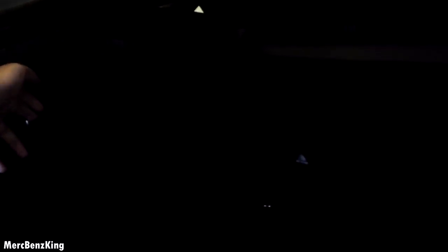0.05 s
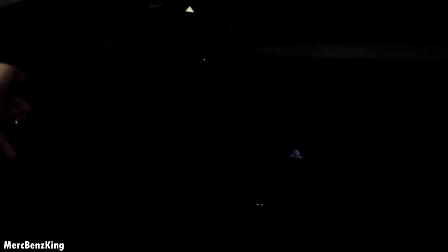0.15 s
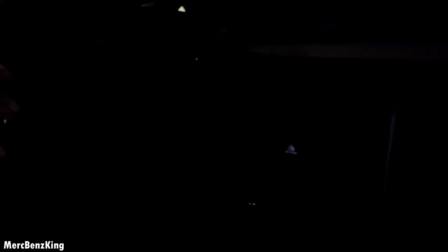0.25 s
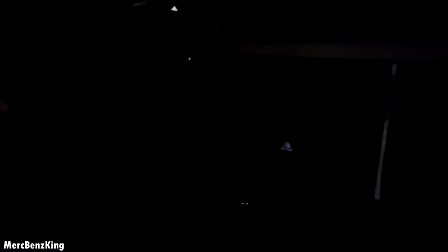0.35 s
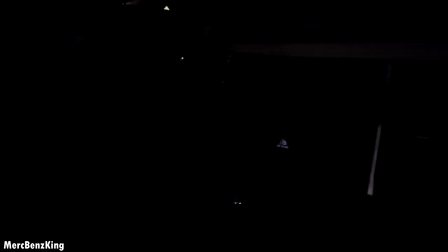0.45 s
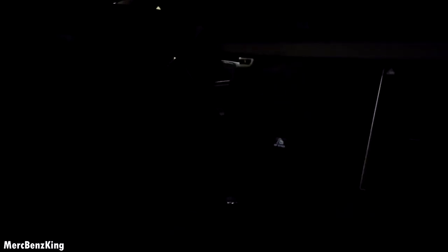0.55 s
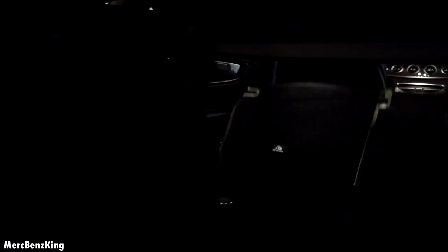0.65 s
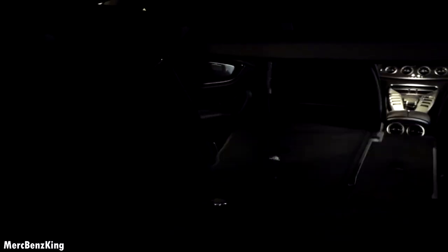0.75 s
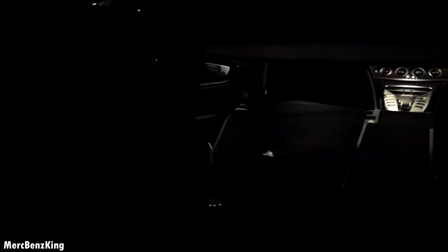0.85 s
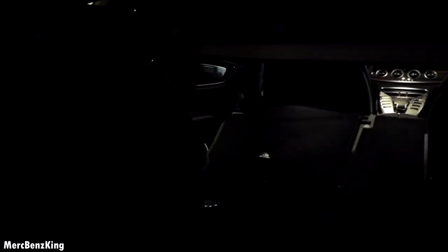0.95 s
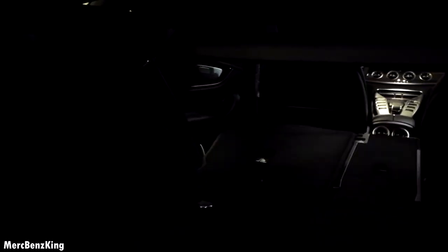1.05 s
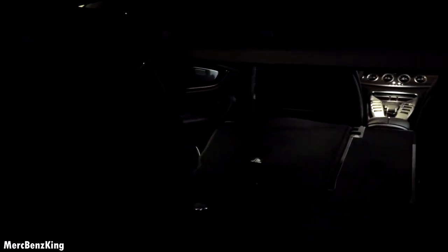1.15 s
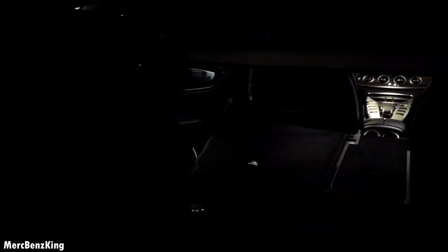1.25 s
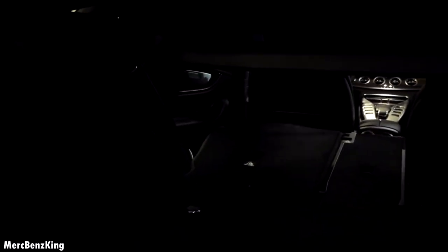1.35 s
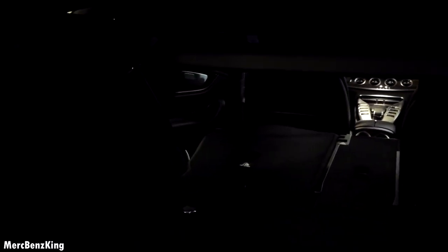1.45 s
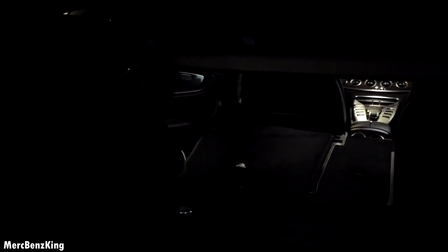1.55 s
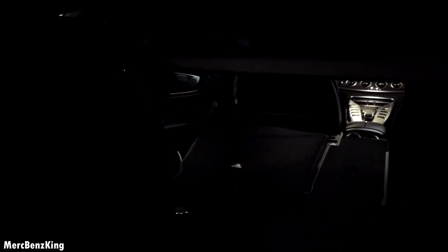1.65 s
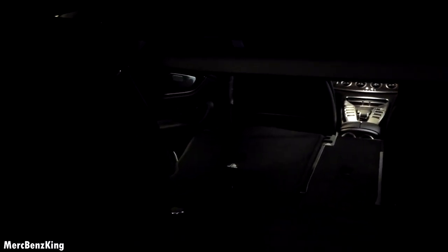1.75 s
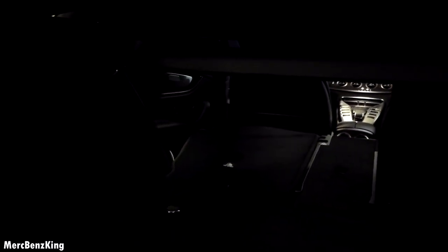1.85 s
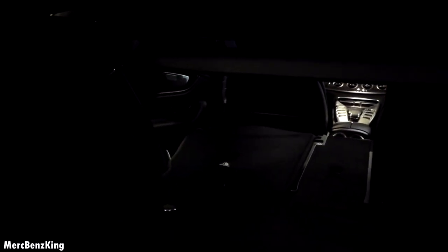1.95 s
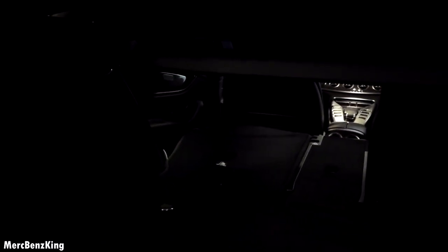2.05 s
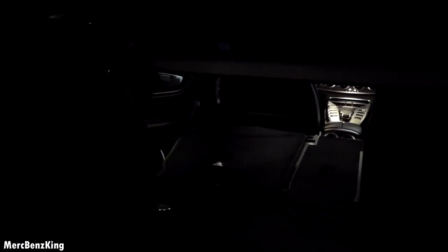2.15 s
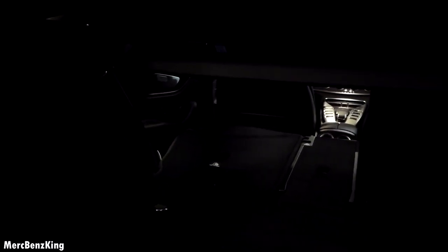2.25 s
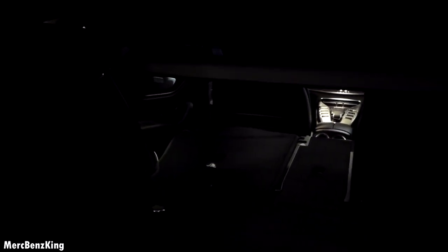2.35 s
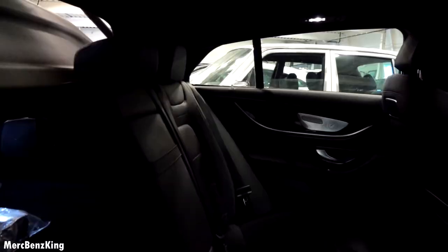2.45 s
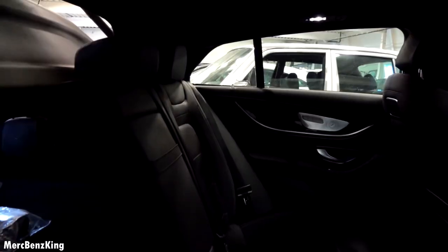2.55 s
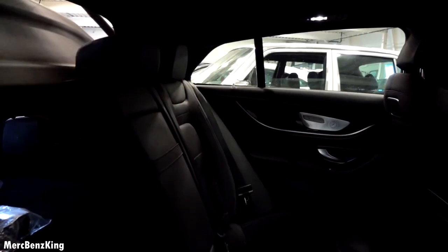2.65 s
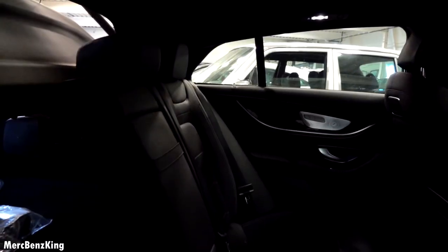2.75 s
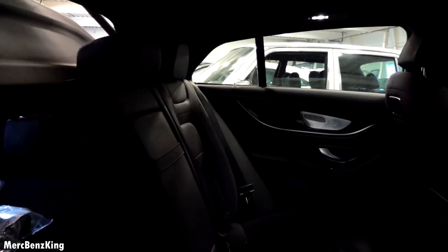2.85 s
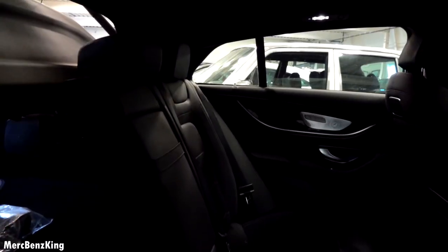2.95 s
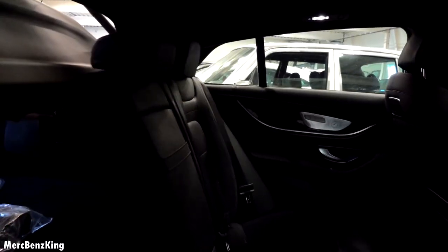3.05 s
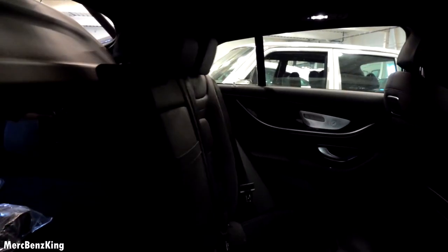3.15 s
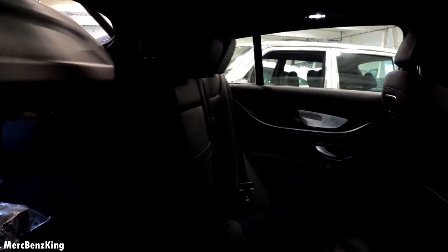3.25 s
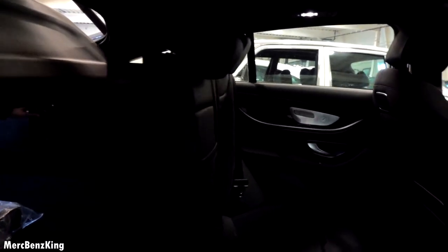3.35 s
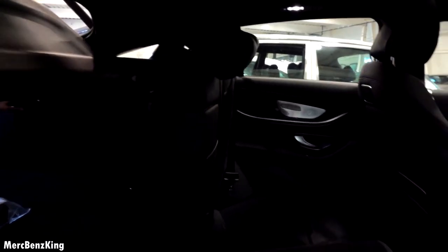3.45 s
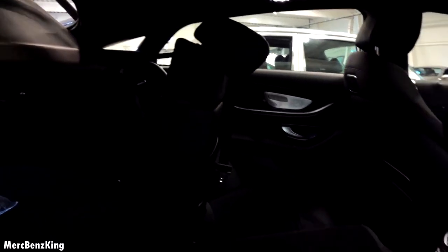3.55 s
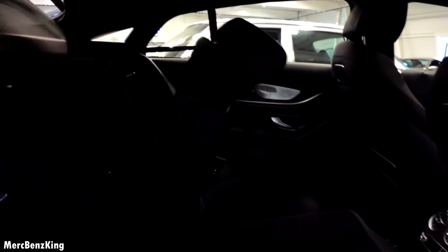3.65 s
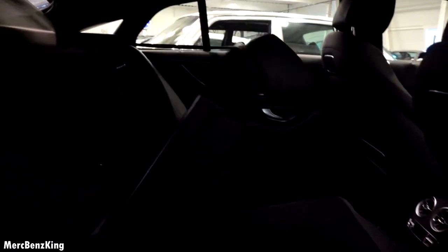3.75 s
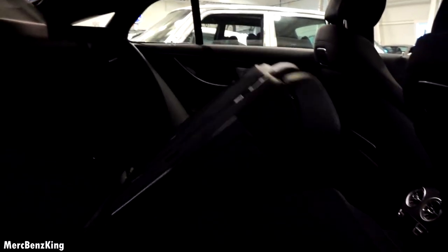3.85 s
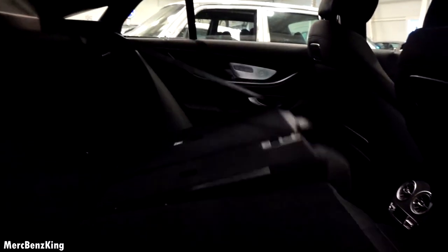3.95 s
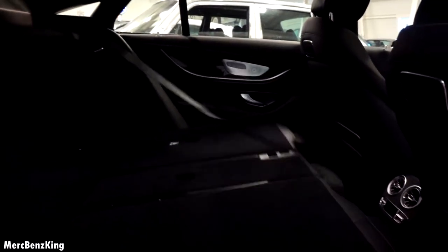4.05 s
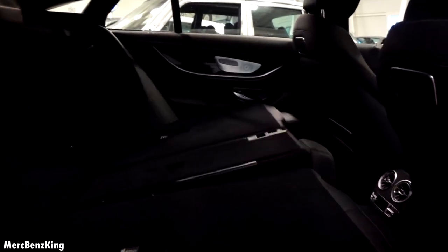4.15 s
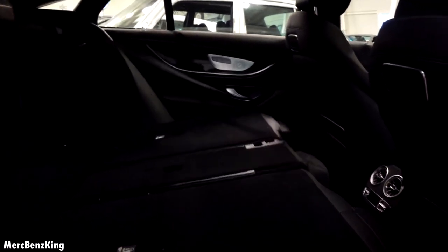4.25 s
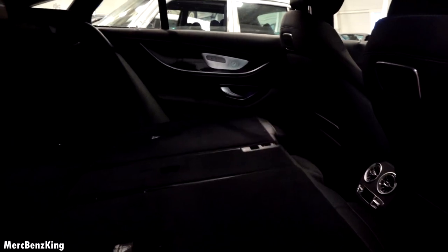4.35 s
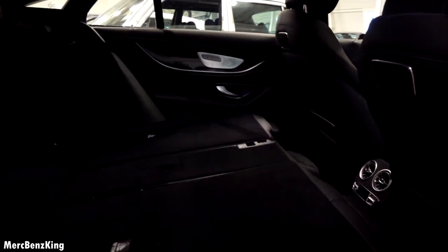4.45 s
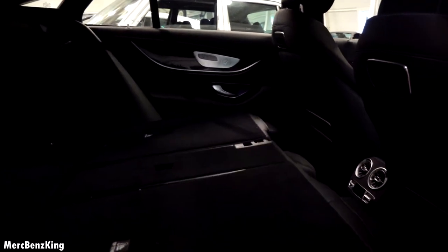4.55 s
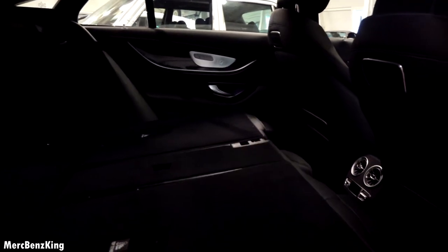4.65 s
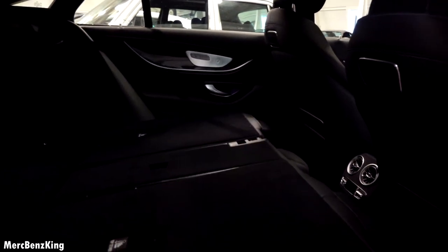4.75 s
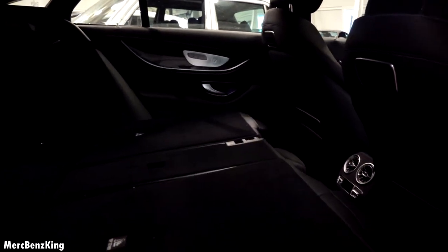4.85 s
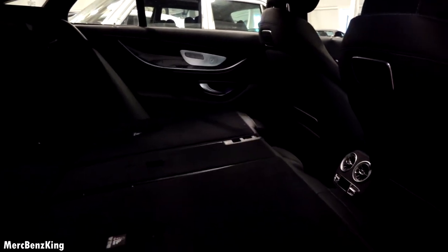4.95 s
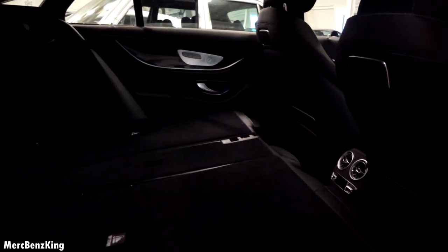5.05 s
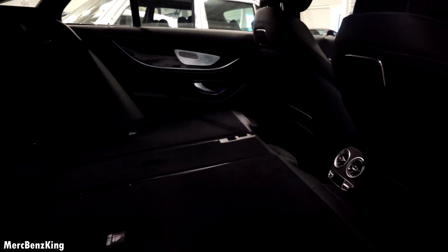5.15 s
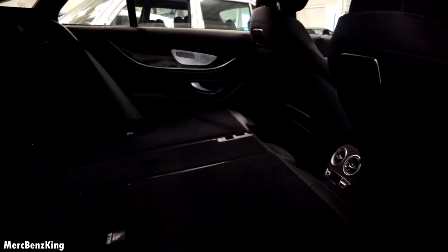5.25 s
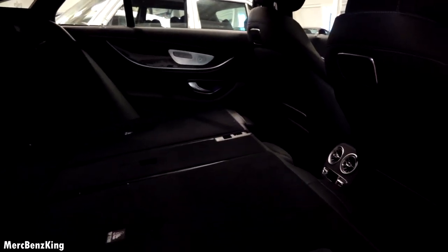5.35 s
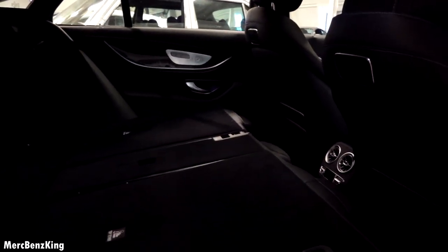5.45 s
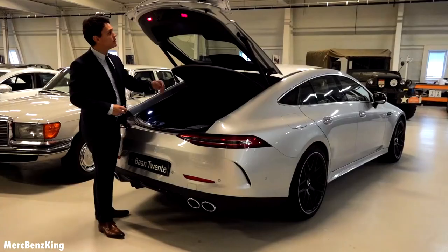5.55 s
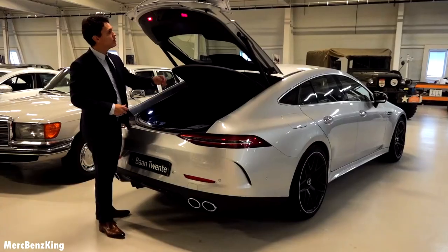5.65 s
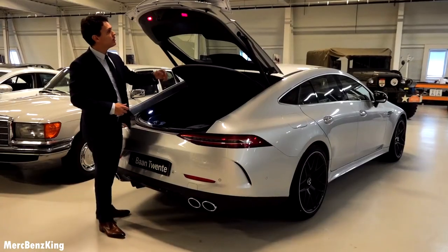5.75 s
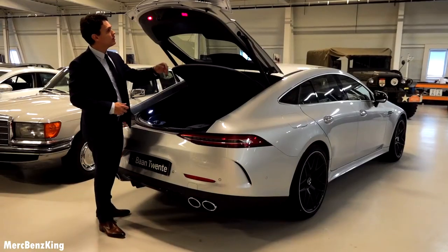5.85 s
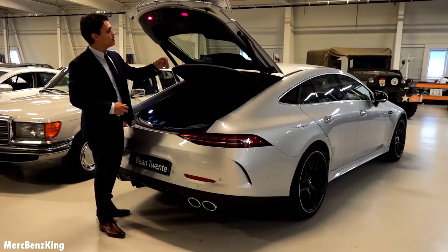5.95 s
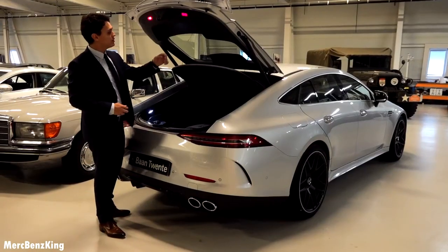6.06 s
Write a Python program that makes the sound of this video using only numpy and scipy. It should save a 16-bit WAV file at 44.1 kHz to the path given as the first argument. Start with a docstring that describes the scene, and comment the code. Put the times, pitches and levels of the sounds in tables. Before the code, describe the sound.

Microphone in a car cabin: cloth and leather swish, then a heavy padded seat back slams down, its low boom shaking the body and bouncing slightly. Quiet room rush follows. A cluster of plastic and metal latch clacks releases the other seat, which slides with a long fading rustle, squeaks faintly and lands with a firm but lighter thud. Finally the hall sounds slightly more open, with three muffled bumps.

```python
"""Folding rear seats in a parked car

Inside a parked car in a quiet hall, two rear backrests fold forward in turn. The first swishes down, lands
with a deep boom and bounces twice; the second unlatches with a few clacks, slides past its belt and lands
with a lighter thud. Filtered noise makes the sliding, squeaks, hums and background; noise bursts through
resonances make the contacts, with a diffuse cabin tail; decaying sines make the boom and the soft bumps outside."""
import sys
import numpy as np
from scipy import signal
from scipy.fft import rfft, irfft
from scipy.io import wavfile

SR = 44100
rng = np.random.default_rng(int(sys.argv[2]) if len(sys.argv) > 2 else 0)


def unload_wav(signal):
    """Save mono or channel-first audio to the path in sys.argv[1] as 16-bit WAV at rate SR, clipped to [-1, 1]."""
    wavfile.write(
        sys.argv[1],
        SR,
        np.round(np.clip(np.atleast_2d(signal).T, -1, 1) * 32767).astype(np.int16),
    )


N = 269539
TIME = np.arange(N) / SR

# low thuds and the boom's lingering ring: start_s, sway_db, boom_db (both before the modes' own levels), push_s
THUDS = [ (0.8265, -27, 0, .022), (0.917, -51, -18.5, 0.0091), (0.971, -39, -28.5, 0.023),
         (1.114, -43.5, -17.5, 0.015), (1.148, -50, -22.5, 0.017), (1.196, -50, -31, 0.02),
         (1.327, -47.5, -31, 0.012), (4.093, -32, -18.5, 0.0066), (4.119, -23.5, -19.5, 0.0054),
         (4.383, -46.5, -28.5, 0.012)]
# spectra of the low rumble and of a narrow rushing band near 1.1 kHz: frequency_hz, level_db
BACKGROUND_SPECTRA = [
    [(20, -15.5), (45, 1), (65, -1), (100, -6), (160, -13), (260, -17), (450, -21), (800, -28.5),
     (1600, -53.5)],
    [(550, -34.5), (780, -17), (920, -8), (1060, -2.5), (1170, -7.5), (1320, -22.5), (1600, -32)],
]


def from_db(db):
    """Amplitude gain from a level: 20 dB is a factor of ten."""
    return 10 ** (np.asarray(db) / 20)


def rms_one(x):
    """Normalisation of the mean power to unit rms."""
    return x / np.sqrt(np.mean(x ** 2) + 1e-20)


def at_hz(points, hz):
    """Linear interpolation of a spectrum on a log-frequency axis."""
    point_hz, value = np.transpose(points)
    return np.interp(np.log(np.maximum(hz, 1)), np.log(point_hz), value)


def coloured(x, spectrum, size=8192):
    """Minimum-phase filtering: the folded cepstrum turns a magnitude spectrum into a causal response."""
    hz = np.maximum(np.fft.rfftfreq(size, 1 / SR), 1)
    octaves_outside = np.abs(np.log2(hz / np.clip(hz, spectrum[0][0], spectrum[-1][0])))
    level_db = at_hz(spectrum, hz) - 18 * octaves_outside   # 18 dB per octave beyond the table's ends
    cepstrum = irfft(np.log(from_db(level_db)))
    cepstrum[1:size // 2] *= 2
    cepstrum[size // 2 + 1:] = 0
    response = irfft(np.exp(rfft(cepstrum)))
    return signal.fftconvolve(x, response)[:len(x)]


def grainy_noise(grain_db, per_s, size=N):
    """Amplitude-modulated white noise: its level wanders between random values drawn at the given rate."""
    knots = rng.standard_normal(size)
    wander = np.interp(np.arange(size) * per_s / SR, np.arange(size), knots)
    return rng.standard_normal(size) * from_db(grain_db * wander)


def resonance(x, hz, width_hz):
    """Damped resonance: a two-pole band-pass with gain 1 at its peak, narrower for less damping."""
    radius = np.exp(-np.pi * width_hz / SR)
    numerator = np.array([1, 0, -1]) * (1 - radius * radius) / 2
    denominator = [1, -2 * radius * np.cos(2 * np.pi * hz / SR), radius * radius]
    return signal.lfilter(numerator, denominator, x + 1e-18)


def rough_tone(hz, width_hz):
    """Quadrature modulation: two slow noises on a carrier make a narrow noise band around it; rms 1."""
    phase = 2 * np.pi * np.cumsum(hz) / SR
    low_pass = signal.butter(2, width_hz / 2, fs=SR, output="sos")
    flutter = signal.sosfilt(low_pass, rng.standard_normal((2, len(hz) + SR // 4)))
    in_phase, quadrature = flutter[:, -len(hz):]   # without the filter's onset
    return rms_one(in_phase * np.cos(phase) + quadrature * np.sin(phase))


def add(track, s, sound):
    """Superposition: mix a sound in at a time."""
    start = max(0, round(s * SR))
    track[start:start + len(sound)] += sound[:max(0, N - start)]


def dying(s, t60):
    """Exponential decay: gain 1 up to a time, then a fall of 60 dB per t60."""
    return from_db(-60 * np.maximum(TIME - s, 0) / t60)


def slide_strengths(release_t60_s=0.51, release_share=.4):
    """Pressure-governed friction: each slide takes hold, changes with the pressure and dies away; powers add."""
    # slides of upholstery and belt: start_s, attack_s, length_s, rustle_db, swish_db, hiss_db,
    # easing_db_per_s (negative: growing); levels before the slide gain in scene()
    slide_events = [ (-.03, 0.043, 0.53, -43.5, -51.5, -53, 18.5),
                    (0.397, .012, 0.074, -47, -59.5, -75, 25), (0.549, 0.018, 0.13, -52.5, -61.5, -57, -1),
                    (0.739, 0.022, 0.15, -44.5, -58, -66, 5), (1.059, 0.046, 0.084, -45, -61, -60, 12),
                    (3.074, .008, 0.19, -48, -49.5, -74, 52), (3.181, 0.059, 0.99, -45.5, -55.5, -63.5, 21),
                    (3.986, .05, .09, -46, -49, -53.5, -1), (4.155, 0.023, 0.044, -55, -50.5, -57, 50),
                    (4.269, 0.038, .12, -40, -55, -56.5, 62)]
    # how rustle, swish and hiss follow a slide: attack_multiple, easing_share
    slide_laws = [(1, 1), (1.1, 0.2), (3, 0.35)]
    power = np.zeros((len(slide_laws), N))
    for s, attack, length, *levels_db, easing_db in slide_events:
        elapsed = np.clip(TIME - s, 0, length)
        release = dying(s + length, release_t60_s + release_share * length)
        for k, (level_db, (slowness, follows)) in enumerate(zip(levels_db, slide_laws)):
            grip = np.minimum(elapsed / (attack * slowness), 1)
            pressure = from_db(level_db - follows * easing_db * elapsed)
            power[k] += (grip * pressure * release) ** 2
    return np.sqrt(power)


def friction(grain_db=1.5, patchy_db=5.0, sharpness=7.3, resonant_share=0.27, count=10):
    """Frictional excitation: fine grains, and cover patches resonating briefly as the contact passes."""
    patches = sum(resonance(grainy_noise(patchy_db, 22), hz, hz / sharpness)
                  for hz in np.geomspace(230, 3800, count))
    return rms_one(grainy_noise(grain_db, 250)) + resonant_share * rms_one(patches)


def sliding(strengths, hiss_grain_db=1.2):
    """Friction noise: leather and cloth rustle and swish; the belt's webbing adds a finer hiss."""
    # spectra of rustle, swish and hiss: frequency_hz, level_db
    rubbing_spectra = [
        [(40, -10), (110, -0.5), (250, -1), (420, -0.5), (800, -9.5), (1300, -18.5), (2500, -43)],
        [(600, -15), (1300, -2.5), (3200, -3), (4700, -7), (6500, -15.5)],
        [(3500, -21.5), (5200, -2), (8000, -3), (10200, -11.5), (11200, -20.5), (15500, -37.5)],
    ]
    rubs = friction(), friction(), grainy_noise(hiss_grain_db, 320)
    return sum(gain * rms_one(coloured(rub, spectrum))
               for gain, rub, spectrum in zip(strengths, rubs, rubbing_spectra))


def body_rumble(rustle, slide_rumble_db=-2.5, thud_rumble_db=-12.5, thud_t60_s=1.59):
    """Structure-borne sound: the car's body rumbles with the rustle and dies away after each thud or ring."""
    power = (from_db(slide_rumble_db) * rustle) ** 2
    for s, sway_db, *_ in THUDS:
        ringing = from_db(sway_db + thud_rumble_db) * dying(s, thud_t60_s)
        power = power + (TIME > s) * ringing ** 2
    return np.sqrt(power) * rms_one(coloured(rng.standard_normal(N), BACKGROUND_SPECTRA[0]))


def background(hiss_db=-73.0):
    """Stationary noise: low rumble, a steady faint hiss and a narrow rushing band near 1.1 kHz."""
    # rumble, one level for each stretch: start_s, level_db
    rumble_steps = [(0, -62), (2.53, -62), (4.5, -58), (5.62, -57)]
    # rushing band, gliding from point to point: time_s, level_db
    rush_curve = [(0, -56), (1.3, -62.5), (1.65, -57), (2.51, -57.5), (2.54, -67.5), (2.95, -65.5),
                  (3.3, -60), (4.7, -59.5), (5.59, -61), (5.63, -57), (6.11, -56)]
    # spectrum of the steady hiss: frequency_hz, level_db
    hiss_spectrum = [(800, -5), (2200, -5), (5300, -6), (6600, 0), (9100, -2), (9600, -8), (15500, -11.5)]
    rumble_db = np.full(N, float(rumble_steps[0][1]))
    for s, level_db in rumble_steps[1:]:
        rumble_db[TIME >= s] = level_db
    rush_db = np.interp(TIME, *np.transpose(rush_curve))
    layers = zip([rumble_db, rush_db, hiss_db], BACKGROUND_SPECTRA + [hiss_spectrum])
    return sum(from_db(level_db) * rms_one(coloured(rng.standard_normal(N), spectrum))
               for level_db, spectrum in layers)


def squeaks():
    """Stick-slip on leather: a rough tone that glides with the sliding speed."""
    # start_s, length_s, first_pitch_hz, last_pitch_hz, width_hz, level_db (before the swell)
    squeak_events = [(0.398, 0.058, 1320, 950, 140, -49.5), (0.409, 0.082, 1950, 1316, 160, -51.5),
                     (0.389, 0.12, 3215, 2145, 480, -51), (2.94, 0.053, 2395, 2650, 200, -56),
                     (3.624, .14, 3100, 2640, 380, -55.5), (3.646, 0.13, 2080, 1755, 320, -58.5),
                     (3.786, 0.18, 1830, 1700, 200, -68)]
    out = np.zeros(N)
    for s, length, first_hz, last_hz, width_hz, level_db in squeak_events:
        progress = np.minimum(np.arange(SR // 4) / (length * SR), 1)
        swell = np.sin(np.pi * progress)
        pitch_hz = first_hz + (last_hz - first_hz) * progress
        add(out, s, from_db(level_db) * swell * rough_tone(pitch_hz, width_hz))
    return out


def contacts(grain_db=-0.5, touch_share=0.23, rattle_s=0.0092, rise_share=.5, longest_rise_s=.007):
    """Impact excitation: a touch within a dying chatter shakes the part's shell and fills the cabin."""
    # hard contacts: start_s, knock_db, dullness_db (lost per register above the knock), thump_db,
    # chatter_s (decay constant), part struck; levels before voicing and radiation
    contact_events = [ (.790, -43.5, 3.1, -34.5, 0.051, "first"), (.8111, -22.5, 7.5, -15, 0.007, "first"),
                      (0.8174, -22, 3, -20, 0.0087, "first"), (.828, -22, 5, -18, 0.01, "first"),
                      (.853, -25, 7, -29.5, 0.004, "first"), (1.121, -45.5, 4.5, -30, 0.011, "first"),
                      (1.1626, -41, 3.7, -39, 0.0083, "first"), (1.328, -64.5, 7, -42, 0.0083, "first"),
                      (2.860, -59.5, 6, -44, 0.014, "latch"), (2.95, -47.5, 8.5, -51, 0.033, "latch"),
                      (2.9727, -49, -4, -29.5, 0.0068, "latch"), (2.982, -41, 9.5, -38, 0.025, "latch"),
                      (3.042, -28.5, 16.5, -32, 0.026, "latch"), (3.072, -26, 3, -28, 0.009, "latch"),
                      (3.096, -34, 14, -30, .014, "latch"), (3.140, -29.5, 10.5, -46, 0.012, "latch"),
                      (4.035, -44, 3, -35, 0.018, "second"), (4.057, -42.5, 1.5, -45, 0.03, "second"),
                      (4.088, -19, 11.5, -17, 0.0032, "second"), (4.093, -24, 2, -18.5, 0.0044, "second"),
                      (4.1034, -24.5, 1.9, -20.5, 0.0068, "second"), (4.136, -44, 4, -34, 0.022, "second"),
                      (4.203, -52.5, 2.6, -42, 0.0056, "second"), (4.305, -44.5, 4.5, -41, 0.016, "second"),
                      (4.379, -49.9, 3, -48, 0.011, "second")]
    # spectra of the registers thump, knock, clack, snap and tick: frequency_hz, level_db
    register_spectra = [
        [(40, -30), (105, 2), (240, -2.5), (340, -10), (450, -25.5), (900, -59)],
        [(200, -31), (400, -2), (720, -5.5), (1100, -9.5), (1500, -23.5), (2400, -44)],
        [(700, -28.5), (1250, 0.5), (2400, -3), (3100, -21), (5000, -53)],
        [(1700, -28.5), (2800, 1.5), (4650, 0.5), (5300, -22.5), (8000, -49.5)],
        [(3500, -29.5), (5200, 1), (8000, -4.5), (10000, -9.5), (11500, -20), (15500, -28.5)],
    ]
    # how readily each part sounds: knock_db, clack_db, snap_db, tick_db
    part_voicing = {"first": (1, -1.5, -1.5, 1.5), "latch": (-0.5, 2.5, 1.5, -6),
                    "second": (2.4, -2.2, 0, -0.73)}
    # diffuse cabin tail in each register: level_db (against a contact whose chatter is rattle_s), t60_s
    cabin_tails = [(-17.5, 0.42), (-18.5, 0.55), (-8, 0.16), (-19, 0.44), (-18, 0.38)]
    # resonances of the two backrests and of the latch: frequency_hz, width_hz, level_db
    shell_modes = { "first": [(147, 18, 4), (166.5, 7.5, 5.5), (216, 28, 4), (310, 6.7, 5.5), (489, 66, 5),
                   (586, 30, 7.5), (672, 90, 4), (770, 58, 0.5), (827, 14, 0.5), (956, 41, 3.5),
                   (1127, 34, 8), (1370, 89, -1), (1580, 76, -1.5), (1960, 250, 6), (2600, 270, 0),
                   (3020, 220, 3), (3236, 410, 6), (4300, 1200, 1), (4400, 100, 5.5), (6335, 660, -10)],
                   "latch": [(156.5, 10, 5), (244, 32, 1), (361, 31, 7.5), (478, 33, -7), (572, 16, -10),
                   (790, 35, -4), (958, 61, 0), (1440, 120, -12), (2390, 105, -3), (2600, 140, 6.5),
                   (3120, 130, 1), (4200, 530, 1.5), (4620, 450, -2.5), (6400, 360, 5)],
                   "second": [(109.5, 14, -3.5), (153, 16, 9.5), (200, 23.8, 4.5), (254, 46, 12.5),
                   (413, 91, 9.5), (498, 11, -0.5), (663, 30, 0.5), (750, 54, 1), (1185, 43, 6),
                   (1350, 330, 3.5), (1750, 130, 1.5), (2700, 690, 9.5), (3130, 168, -15), (5420, 683, 4),
                   (8460, 817, -1.5)]}
    # share of a blow heard directly and through the part's resonances: direct_db, ringing_db
    part_radiation = {"first": (-3.5, -0.92), "latch": (-4.6, -0.5), "second": (-3, -1.6)}
    forces = {part: np.zeros(N) for part in shell_modes}
    diffuse, t = np.zeros(N), np.arange(SR // 2) / SR
    for s, knock_db, dullness_db, thump_db, chatter, part in contact_events:
        # each higher register loses more by the contact's dullness
        upper_db = [knock_db + db - k * dullness_db for k, db in enumerate(part_voicing[part])]
        levels_db = [thump_db] + upper_db
        rise = min(rise_share * chatter, longest_rise_s)
        envelope = np.minimum(t / rise, 1) ** 2 * np.exp(-np.maximum(t - rise, 0) / chatter)
        touch = rms_one(signal.unit_impulse(len(t), int(rise * SR)))
        # a longer chatter puts more energy into the cabin
        filling = np.sqrt(chatter / rattle_s) * np.cumsum(envelope) / np.sum(envelope)
        registers = zip(levels_db, register_spectra, cabin_tails)
        for k, (level_db, spectrum, (tail_db, t60)) in enumerate(registers):
            rattle = rms_one(grainy_noise(grain_db, 1500, size=len(t)) * envelope)
            # the padded touch fades from the high registers
            blow = coloured(rattle + touch_share / 2 ** k * touch, spectrum)
            add(forces[part], s, from_db(level_db) * rms_one(blow) * np.sqrt(np.mean(envelope ** 2)))
            wash = rms_one(coloured(rng.standard_normal(len(t)), spectrum))
            add(diffuse, s, wash * filling * from_db(level_db + tail_db - 60 * t / t60))
    out = diffuse
    for part, (direct_db, ringing_db) in part_radiation.items():
        shell = sum(from_db(db) * resonance(forces[part], hz, width_hz)
                    for hz, width_hz, db in shell_modes[part])
        out = out + from_db(direct_db) * forces[part] + from_db(ringing_db) * shell
    return out


def thuds():
    """Modal excitation: the low modes swell gradually at each thud or ring, then decay exponentially."""
    # the seat's slow sway, then the cabin's boom: frequency_hz, level_db, t60_s
    sway_modes = [(26.24, 5, 0.33)]
    boom_modes = [(71.5, 0.5, 0.14), (94, -11.5, 0.23), (128, -22, 0.27)]
    out, t = np.zeros(N), np.arange(SR) / SR
    for s, sway_db, boom_db, push in THUDS:
        swell = np.sin(np.pi / 2 * np.minimum(t / push, 1))
        for level_db, modes in ((sway_db, sway_modes), (boom_db, boom_modes)):
            for hz, mode_db, t60 in modes:
                decay_db = -60 * np.maximum(t - push, 0) / t60
                gain = from_db(level_db + mode_db + decay_db)
                add(out, s, swell * gain * np.sin(2 * np.pi * hz * t))
    return out


def drones(fade_s=0.0037):
    """Narrow-band noise: faint unsteady hums and rushes, each lasting a while."""
    # start_s, end_s, frequency_hz, width_hz, level_db
    drone_events = [(1.448, 2.53, 95.75, 15.4, -61.5), (2.558, 2.85, 439, 100, -68.5),
                    (5.612, 6.2, 65.3, 11.2, -51.5), (5.621, 6.2, 114.5, 15, -57),
                    (5.621, 6.2, 1159, 500, -62.5)]
    out, t = np.zeros(N), np.arange(2 * SR) / SR
    for start, end, hz, width_hz, level_db in drone_events:
        sounding = np.clip(np.minimum(t, end - start - t) / fade_s, 0, 1)
        add(out, start, from_db(level_db) * sounding * rough_tone(np.full(len(t), hz), width_hz))
    return out


def bumps():
    """Heavily damped modes: each soft bump out in the hall is a sum of quickly dying sines."""
    # start_s, peak_db
    bump_events = [(5.664, -43), (5.722, -40.5), (5.824, -38.5)]
    # modes shared by the bumps: frequency_hz, level_db (relative to each other), t60_s
    knock_modes = [(133.3, 4, 0.059), (213, 11.5, 0.056), (261, -11.5, 0.04)]
    out, t = np.zeros(N), np.arange(SR // 4) / SR
    knock = sum(from_db(db - 60 * t / t60) * np.sin(2 * np.pi * hz * t) for hz, db, t60 in knock_modes)
    for s, peak_db in bump_events:
        add(out, s, from_db(peak_db) * knock / np.max(np.abs(knock)))
    return out


def scene(slide_db=1.0):
    """Superposition of the seats in the cabin and the steady background."""
    strengths = slide_strengths()
    slides = from_db(slide_db) * sliding(strengths)
    seats = slides + body_rumble(strengths[0]) + squeaks() + contacts() + thuds()
    return (seats + background() + drones() + bumps())[None]


def record(dry, ceiling=0.8, cutoff_hz=15500):
    """Saturation and low-pass filtering: the largest peaks are rounded and the top is cut."""
    rounded = ceiling * np.tanh(dry / ceiling)
    low_pass = signal.ellip(10, .1, 90, cutoff_hz, fs=SR, output="sos")
    return signal.sosfilt(low_pass, rounded)


dry = scene()
out = record(dry)
unload_wav(out)
```